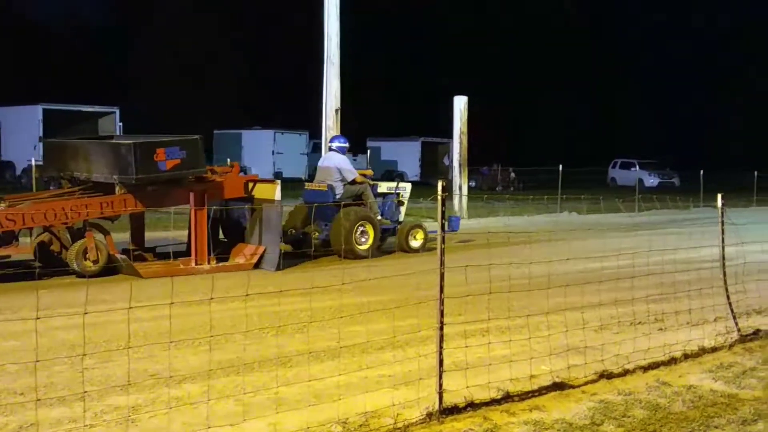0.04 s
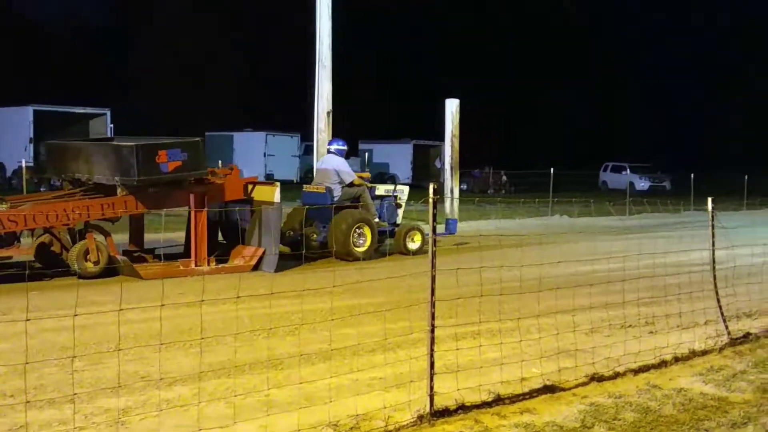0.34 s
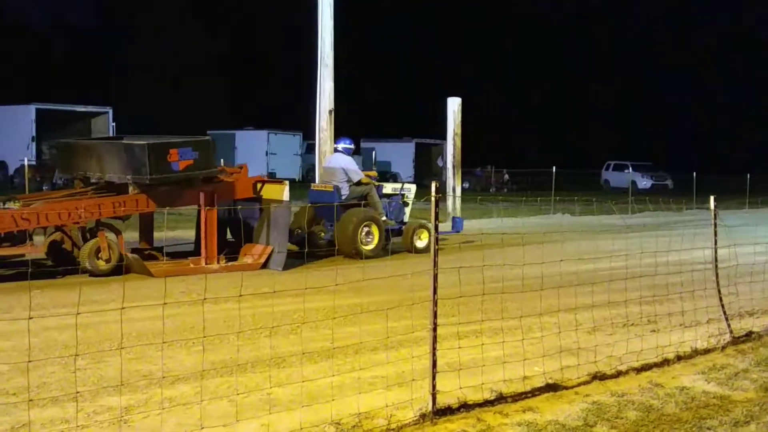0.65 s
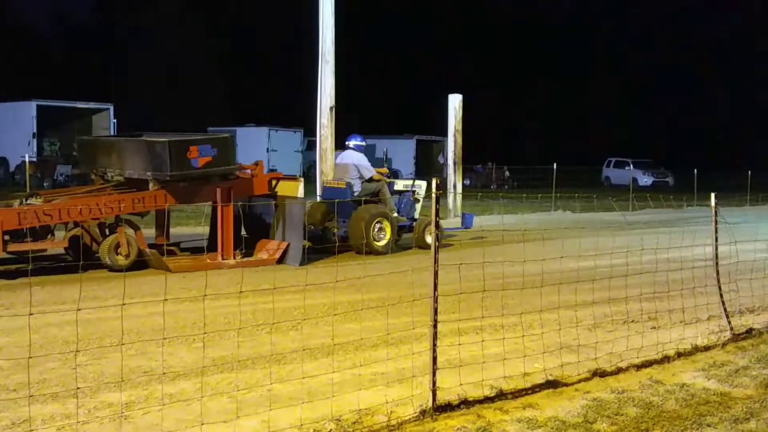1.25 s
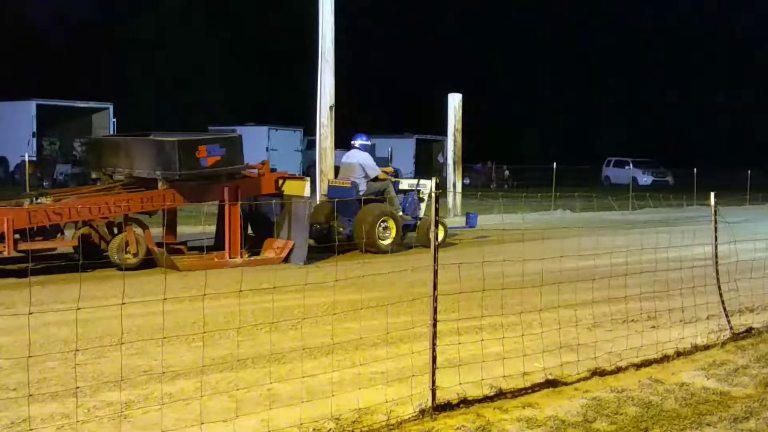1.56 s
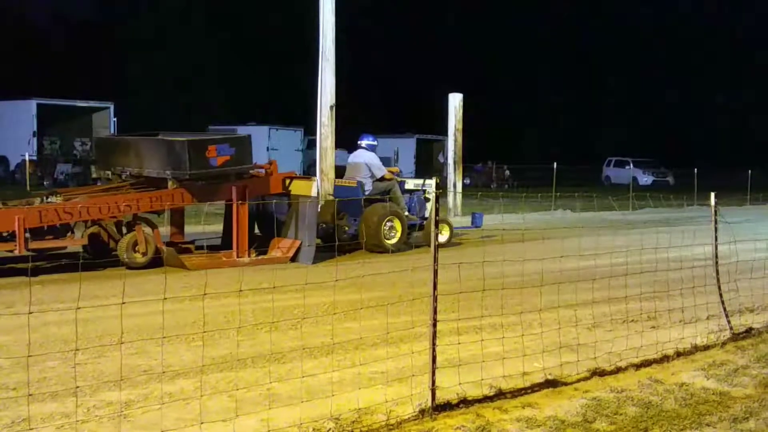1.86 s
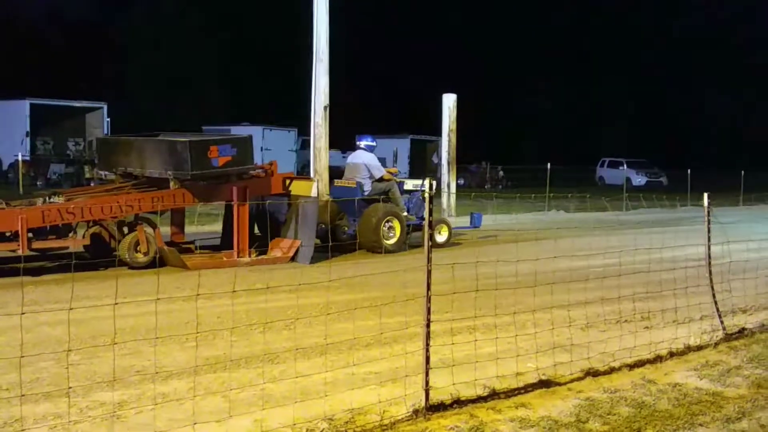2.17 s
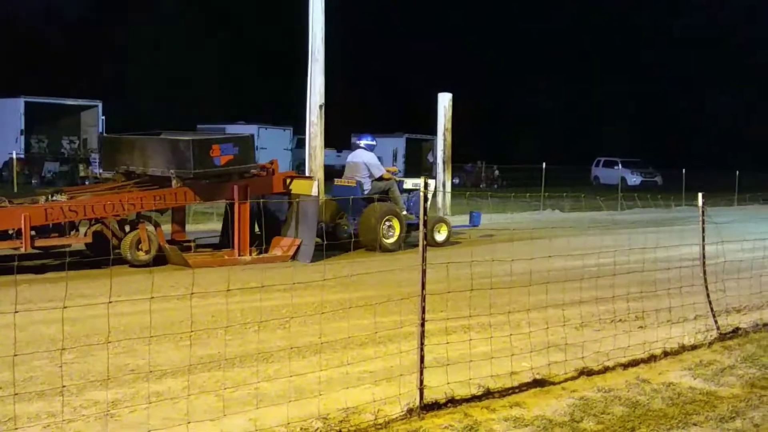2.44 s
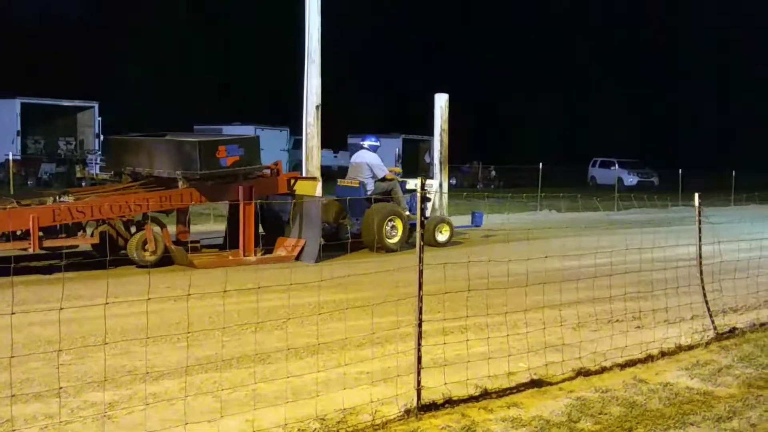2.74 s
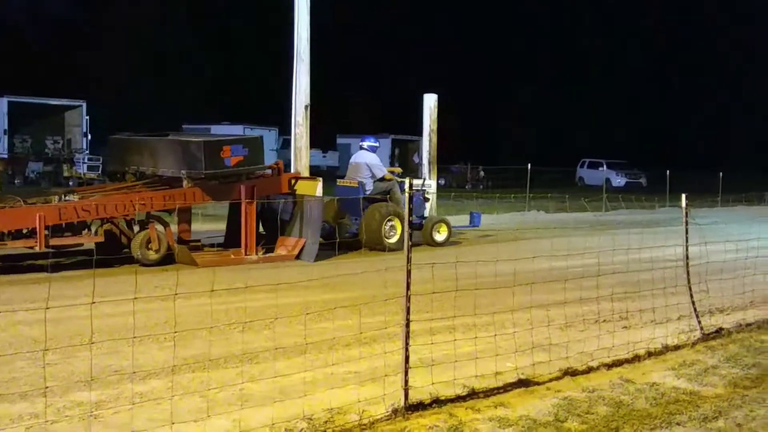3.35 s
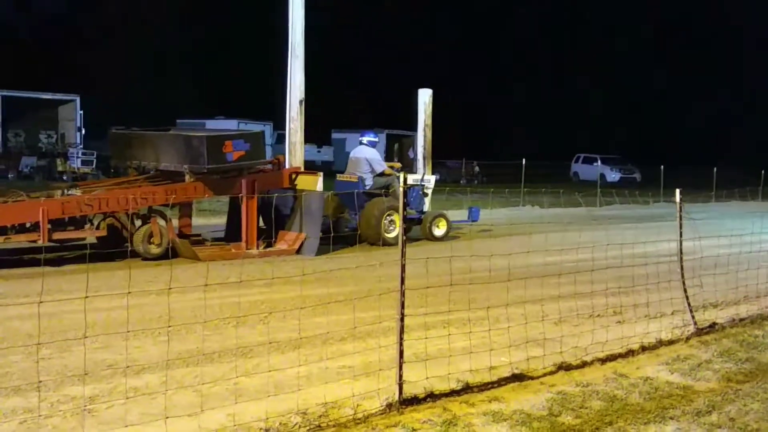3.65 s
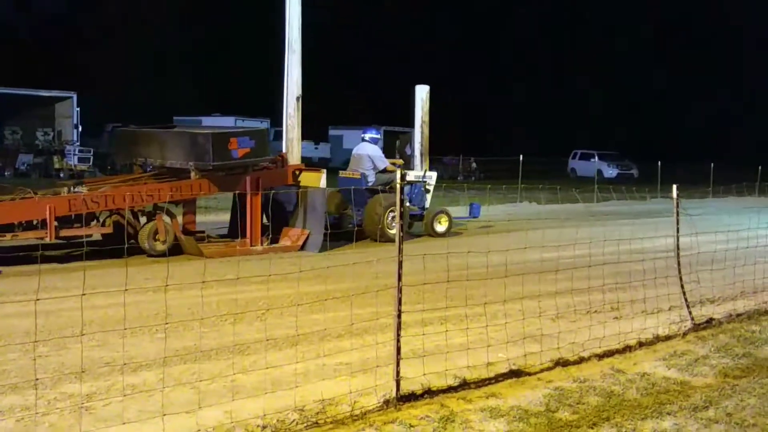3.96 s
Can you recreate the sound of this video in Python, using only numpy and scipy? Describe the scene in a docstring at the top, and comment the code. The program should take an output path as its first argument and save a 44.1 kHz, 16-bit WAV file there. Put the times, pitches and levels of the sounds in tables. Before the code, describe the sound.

A small tractor engine thumps rapidly and steadily under load for all four seconds, outdoors. Loose metal clacks, clinks and jingles with each firing, while a dragged steel sled rings roughly over scraping dirt. Brief metal squeals come at the start and near 0.7, 1.5 and 3.5 seconds, with faint hollow swells in the first second. The sled bumps at about 0.5 and 2.8 seconds.

```python
"""A small one-cylinder tractor drags a heavy steel sled along an open dirt track at steady speed.
Each firing sends a low thump through the muffler and jolts loose metal, which clacks, clinks and jingles.
Steel, most likely the dragged sled, sings roughly at a few fixed pitches over scraping dirt.
Brief squeals, hollow swells and a few bumps of the sled come through."""
import sys
import numpy as np
from scipy import signal
from scipy.fft import rfft, irfft
from scipy.io import wavfile

SR = 44100
rng = np.random.default_rng(int(sys.argv[2]) if len(sys.argv) > 2 else 0)


def materialize(psi):
    """Save the field psi as 16-bit PCM at rate SR to the path in sys.argv[1].

    A 1-D psi becomes a single channel; in a 2-D psi each row is a channel.
    """
    bounded = np.clip(np.atleast_2d(psi).T, -1, 1)
    quanta = np.round(bounded * 32767).astype(np.int16)
    wavfile.write(sys.argv[1], SR, quanta)


N = 176400
T = np.arange(N) / SR

# Engine speed. Each row: time in seconds, firings per second.
FIRING_RATE = [(0, 22.75), (.5, 22.75), (.8, 22.82), (1.4, 22.755), (2.4, 22.755), (2.8, 22.65),
               (3.2, 22.8), (3.6, 22.68), (4, 22.68)]
# Exhaust spectrum. Each row: multiple of the mean firing rate, relative level in dB.
EXHAUST_ORDERS = [(1, -62), (2, -41), (3, -46), (4, -20), (5, -8.5), (6, -1.5), (7, 2.5), (8, -20), (9, -8),
                  (10, -7), (11, -7.5), (12, -4), (13, -18), (14, -28), (15, -14.5), (16, -18.5), (17, -25),
                  (18, -30), (19, -43), (20, -18.5), (21, -25), (22, -24.5), (23, -15.5), (24, -29),
                  (25, -16.5), (26, -48), (27, -14.5), (28, -22)]
# Resonances of the dragged steel. Each row: pitch in Hz, width in Hz, level in dB.
STEEL_MODES = [(697.8, 59.4, -38), (752.5, 44, -36), (844, 18, -43), (908.8, 54.6, -35.5),
               (1349, 64, -41.5), (1392, 48, -37.5), (1446.3, 39, -39), (2145, 103, -45.5)]
# Its sharpest rings. Each row: pitch in Hz, rms waver in Hz, level in dB.
STEEL_TONES = [(699, 2.48, -46), (912.7, 2.45, -39), (1402, 2.5, -48.5), (2139, 2.26, -47.5)]
# Steel loudness. Each row: time in seconds, relative dB below 1800 Hz, relative dB above.
STEEL_CURVES = [(0, 1.5, 8), (.15, 2.5, 13), (.33, 0.5, 8.5), (.5, 2, 10.5), (.8, 1.5, 9.5), (.95, 0, 6),
                (1.45, .5, 7.5), (1.9, 0.5, 13.5), (2.4, 0.5, 8.5), (3, 0.5, 6.5), (3.55, -1, 7),
                (4, -0.5, -5)]
# Dirt and far background. Each row: frequency in Hz, relative density in dB.
GROUND_SPECTRUM = [(25, -28), (60, -5), (110, 13.5), (250, 11), (520, 6), (1100, -79), (1700, 5),
                   (2400, -7), (4000, -6.5), (6300, -31.5), (8000, -27), (10000, -19.5), (13500, -23),
                   (16000, -28)]
# Modes of the loose metal. Each row: pitch in Hz, ring width in Hz, ring level in dB, clack level in dB.
METAL_MODES = [(2798, 110, -80.5, -61), (2954, 22, -60, -59), (3355, 77, -56, -57.5),
               (4097, 55, -65, -61.5), (4345, 113, -50.5, -49), (4949, 130, -52.5, -52.5),
               (5663, 170, -57, -70.5), (6240, 160, -76.5, -61), (6390, 14, -67, -72),
               (6850, 260, -60, -56.5), (7487, 150, -47, -51), (8400, 440, -63.5, -69),
               (9080, 85, -68.5, -68), (10870, 120, -73, -66.5), (11460, 220, -61.5, -63),
               (12200, 100, -65.5, -76.5), (12300, 120, -70, -86), (12770, 190, -68.5, -80),
               (13900, 40, -74, -76), (14600, 80, -81, -73), (15550, 240, -84, -64), (15400, 120, -81, -71)]
# Hardest strokes. Each row: time in seconds, relative force in dB below 6 kHz, the same for 6-9.5 kHz,
# clink pitch in Hz.
HARD_STROKES = [(0.131, 6.5, -4, 4160), (0.175, 9.5, -7, 5620), (0.22, 6, 10.5, 6900),
                (0.2638, 7.5, 13.5, 7590), (0.3076, 10, 6, 4940), (0.4392, 5.5, 8.5, 7470),
                (0.6593, 7.5, 0, 7490), (0.701, 9, 12, 4270), (0.746, 11, 4.5, 5010),
                (0.7885, 10.5, 10, 5010), (1.2727, 3.5, 7, 7520), (1.5368, 12, 9, 7570),
                (1.5811, 11.5, -2, 7560), (1.7115, 6, 11, 7420), (1.7572, 6.5, 7, 4300),
                (1.798, 7.5, -2, 4210), (1.9322, 8.5, 4, 7490), (2.1072, 9.5, -17, 4290),
                (2.5482, -12, 13, 7490), (2.901, 8.5, 13, 4480), (3.0304, 11.5, 12.5, 4360),
                (3.2953, 6, -10, 7500), (3.3393, 9, 1, 4290), (3.429, -2, 8, 7520), (3.6048, 13, 13, 4300),
                (3.7369, 13, 7, 7480), (3.9131, -11, 9, 7550), (3.9565, 6.5, 9.5, 7540)]
# Jingle loudness. Each row: time in seconds, relative dB below 6 kHz, for 6-9.5 kHz, and above.
JINGLE_CURVES = [(0, 3.5, 1, 1.5), (.75, 5, -2.5, 7.5), (1, 1.5, 4.5, 0), (1.85, 2, -1.5, 3),
                 (2.55, -3, -3, 2), (4, -2.5, -4, -7)]
# Clack force above 14 kHz. Each row: time in seconds, relative level in dB.
TOP_CLACK_CURVE = [(.55, -8), (.7, 3), (1.15, 11), (1.28, -7), (1.8, -3), (1.95, -7), (2.7, -6), (2.92, 21),
                   (3.05, -5), (3.15, 24), (3.26, -6), (3.43, 11), (3.85, 10), (3.93, 21)]
# Metal squeals. Each row: centre in seconds, length in seconds, pitch in Hz, level in dB.
SQUEALS = [(.13, 0.34, 2060, -45.5), (.72, 0.055, 1960, -41.5), (.78, .045, 776, -29.5),
           (1.45, 0.079, 786, -31.5), (1.54, 0.15, 1940, -52), (3.52, 0.028, 1945, -40)]
# Hollow low swells. Each row: centre in seconds, length in seconds, pitch in Hz, level in dB.
HOLLOW_SWELLS = [(.29, 0.096, 351, -39.5), (.7, 0.33, 339, -50.5)]
# Sled bumps. Each row: time in seconds, relative peak in dB, pitch in Hz.
BUMPS = [(.4775, -21, 820), (.492, -22, 770), (2.8395, -26, 780)]


def from_db(db):
    """Decibels to gain."""
    return 10 ** (np.asarray(db) / 20)


def unit_rms(x):
    """Scale to unit power."""
    return x / np.sqrt(np.mean(x ** 2) + 1e-20)


def gain_curves(rows):
    """Each dB column as a unit-power gain over time."""
    times_s, *columns_db = np.transpose(rows)
    return [unit_rms(from_db(np.interp(T, times_s, db))) for db in columns_db]


def drift(rate_hz):
    """Smooth random motion, unit power."""
    hop, settle = 40, 2000
    r = np.exp(-2 * np.pi * rate_hz * hop / SR)
    slow = signal.lfilter([1], [1, -2 * r, r * r], rng.standard_normal(N // hop + settle + 2))[settle:]
    return np.interp(np.arange(N) / hop, np.arange(len(slow)), unit_rms(slow))


def resonate(x, hz, width_hz, skirt=1):
    """Two resonators in series, the second skirt times as wide; run in, unit power."""
    y = np.concatenate([x[-SR // 2:], x])
    for stage_hz in (width_hz, width_hz * skirt):
        r = np.exp(-np.pi * stage_hz / SR)
        poles = [1, -2 * r * np.cos(2 * np.pi * hz / SR), r * r]
        y = signal.lfilter([1 - r, 0, r - 1], poles, y + 1e-18)
    return unit_rms(y[-N:])


def noise():
    """White noise."""
    return rng.standard_normal(N)


def clicks(times_s, db):
    """One impulse at each time."""
    out = np.zeros(N)
    inside = (times_s >= 0) & (times_s < (N - 1) / SR)
    out[(times_s[inside] * SR).astype(int)] = from_db(db)[inside]
    return out


def firing_times(first_s=.0425):
    """The cylinder fires once per engine cycle."""
    cycles = np.cumsum(np.interp(T, *np.transpose(FIRING_RATE))) / SR
    return first_s + np.interp(np.arange(int(cycles[-1])), cycles, T)


def exhaust(fires_s, level_db=-41, uneven_db=.5, lead_s=.001, muffler_hz=174, muffler_width_hz=52):
    """Each firing sends a pulse through the muffler, which colours and smears it."""
    multiple, db = np.transpose(EXHAUST_ORDERS)
    size = SR // 2
    orders = np.fft.rfftfreq(size, 1 / SR) / np.mean(np.array(FIRING_RATE)[:, 1])
    colour_db = np.interp(orders, np.r_[0, multiple, 2 * multiple[-1]], np.r_[-70, db, -70])
    cepstrum = irfft(np.log(from_db(colour_db)), size)[:size // 2]
    thump = irfft(np.exp(rfft(np.r_[cepstrum[0], 2 * cepstrum[1:]], size)), size)  # minimum phase
    r = np.exp(-np.pi * muffler_width_hz / SR)
    poles = [1, -2 * r * np.cos(2 * np.pi * muffler_hz / SR), r * r]
    smeared = signal.lfilter(poles[::-1], poles, thump)  # all-pass
    times_s = np.r_[0, fires_s - lead_s]
    pulses = clicks(times_s, uneven_db * rng.standard_normal(len(times_s)))
    return from_db(level_db) * unit_rms(signal.fftconvolve(pulses, smeared)[:N])


def dragged_steel(fires_s, shake_share=.11, throb_db=.5, flicker_db=2, tone_flicker_db=3.5):
    """Friction and a little engine shake keep the steel's resonances sounding."""
    levels, split_hz, out = gain_curves(STEEL_CURVES), 1800, 0
    shake = unit_rms(clicks(fires_s, rng.standard_normal(len(fires_s))))
    throb = np.cos(2 * np.pi * np.interp(T, fires_s, np.arange(len(fires_s))))
    for hz, width_hz, db in STEEL_MODES:
        friction = unit_rms(noise() * from_db(throb_db * throb + flicker_db * drift(rate_hz=5.2)))
        drive = np.sqrt(1 - shake_share) * friction + np.sqrt(shake_share) * shake
        out += from_db(db) * levels[int(hz > split_hz)] * resonate(drive, hz, width_hz)
    for hz, waver_hz, db in STEEL_TONES:
        tone = np.sin(2 * np.pi * np.cumsum(hz + waver_hz * drift(rate_hz=8.17)) / SR)
        flicker = from_db(tone_flicker_db * drift(rate_hz=13.4))
        out += from_db(db) * levels[int(hz > split_hz)] * unit_rms(tone * flicker)
    return out


def ground(level_db=-51.5):
    """Scraping dirt and far background: steady shaped noise."""
    hz, db = np.transpose(GROUND_SPECTRUM)
    colour_db = np.interp(np.log(np.fft.rfftfreq(N, 1 / SR) + 1), np.log(hz), db)
    return from_db(level_db) * unit_rms(irfft(rfft(noise()) * from_db(colour_db), N))


def stroke_forces_db(fires_s, ordinary_db=-2.5, uneven_db=1.5, hard_db=-6.5, top_share=.14):
    """Force of each stroke on the loose metal in four bands, low to high."""
    hard_s, low_db, high_db, _ = np.transpose(HARD_STROKES)
    hard = np.argmin(abs(fires_s - hard_s[:, None]), axis=1)
    force_db = np.tile(ordinary_db + uneven_db * rng.standard_normal(len(fires_s)), (4, 1))
    force_db[0] += 10 * np.log10(np.interp(fires_s, T, gain_curves(JINGLE_CURVES)[0]))
    force_db[:2, hard] = hard_db + low_db, hard_db + high_db
    force_db[2:, hard] += top_share * (low_db + high_db)
    force_db[3] += 20 * np.log10(np.interp(fires_s, T, gain_curves(TOP_CLACK_CURVE)[0]))
    return force_db


def rattle(fires_s):
    """Each firing jolts loose metal: a clack between two light taps, then chatter, over a jingle."""
    contact_s, lead_s, jitter_s, uneven_db = .0018, .00091, .00071, 7
    tap_gap_s, tap_db = .0085, -16.5
    chatter_s, chatter_db, chatter_uneven_db = .024, -4.5, -1.5
    jingle_db, flicker_db, jolt_share, skirt = -12, 8.5, .44, 1.34
    force_db = stroke_forces_db(fires_s)
    preroll_s = 2 * tap_gap_s
    age_s = T[:SR // 10] - preroll_s
    taps = from_db(tap_db) * np.exp(-.5 * ((abs(age_s) - tap_gap_s) / contact_s) ** 2)
    contact = np.exp(-.5 * (age_s / contact_s) ** 2) + taps
    decay = from_db(chatter_db) * np.exp(-abs(age_s) / chatter_s) * (age_s > 0)
    levels, out = gain_curves(JINGLE_CURVES), 0
    for hz, width_hz, ring_db, clack_db in METAL_MODES:
        band = np.searchsorted([6000, 9500, 14000], hz)
        late, strong, loose = np.minimum(rng.standard_normal((3, len(fires_s))), 1)
        times_s = fires_s - preroll_s - lead_s + jitter_s * late
        jolts = signal.oaconvolve(clicks(times_s, force_db[band] + uneven_db * strong), contact)[:N]
        chatter = signal.oaconvolve(clicks(times_s, force_db[band] + chatter_uneven_db * loose), decay)
        flicker = np.minimum(drift(rate_hz=9.1), 2)
        jingle = levels[min(band, 2)] * from_db(jingle_db + flicker_db * flicker)
        ring = resonate(noise() * (jolt_share * jolts + chatter[:N] + jingle), hz, width_hz, skirt)
        clack = resonate(noise() * jolts, hz, width_hz=208, skirt=skirt)
        out += from_db(ring_db) * ring + from_db(clack_db) * clack
    return out


def clinks(fires_s, level_db=-38.5, rise_s=.002, tail_db=-9, tail_s=.039, waver_hz=56):
    """One part rings on each stroke, a louder one on hard strokes: a burst, then a fluttering tail."""
    light_db, uneven_db, range_hz = -6, 1, (2875, 8360)
    age_s, out = T[:SR // 10], np.zeros(N + SR)
    burst = np.exp(-.5 * (age_s / rise_s - 2) ** 2)
    tail = from_db(tail_db) * np.exp(-age_s / tail_s) * (1 - np.exp(-age_s / rise_s))
    light = [(at_s, light_db + uneven_db * rng.standard_normal(), rng.uniform(*range_hz))
             for at_s in fires_s]
    hard = [(at_s, max(low_db, high_db), hz) for at_s, low_db, high_db, hz in HARD_STROKES]
    waver, flutter = np.tile(drift(rate_hz=78), 2), np.tile(drift(rate_hz=52), 2)
    for at_s, db, hz in light + hard:
        span = max(int((at_s - 2 * rise_s) * SR), 0) + np.arange(len(age_s))
        phase = 2 * np.pi * np.cumsum(hz + waver_hz * waver[span]) / SR
        out[span] += from_db(db + level_db) * (burst + tail * flutter[span]) * np.sin(phase)
    return out[:N]


def brief_rings(rows, width_hz):
    """A rough, narrow resonance swells and fades for each row."""
    return sum(from_db(db) * np.exp(-2 * ((T - at_s) / length_s) ** 2) * resonate(noise(), hz, width_hz)
               for at_s, length_s, hz, db in rows)


def sled_bumps(sigma_s=.003, gain=2):
    """The sled bumps: a few cycles at the pitch of its steel."""
    out = 0
    for at_s, db, hz in BUMPS:
        envelope = np.exp(-.5 * ((T - at_s) / sigma_s) ** 2)
        out += gain * from_db(db) * envelope * np.sin(2 * np.pi * hz * (T - at_s))
    return out


def scene():
    """Tractor and sled in mono, on one firing clock."""
    fires_s = firing_times()
    sled = dragged_steel(fires_s) + sled_bumps()
    sled += brief_rings(SQUEALS, width_hz=117) + brief_rings(HOLLOW_SWELLS, width_hz=62)
    return (sled + ground() + exhaust(fires_s) + rattle(fires_s) + clinks(fires_s))[None]


def record(dry):
    """Steep low-pass on the top treble."""
    cutoff_hz = 15850
    return signal.sosfilt(signal.ellip(10, .1, 80, cutoff_hz, fs=SR, output="sos"), dry)


dry = scene()
out = record(dry)
materialize(out)
```